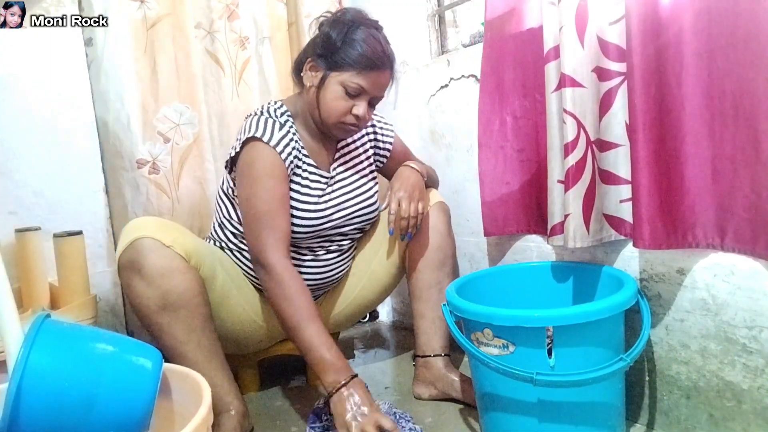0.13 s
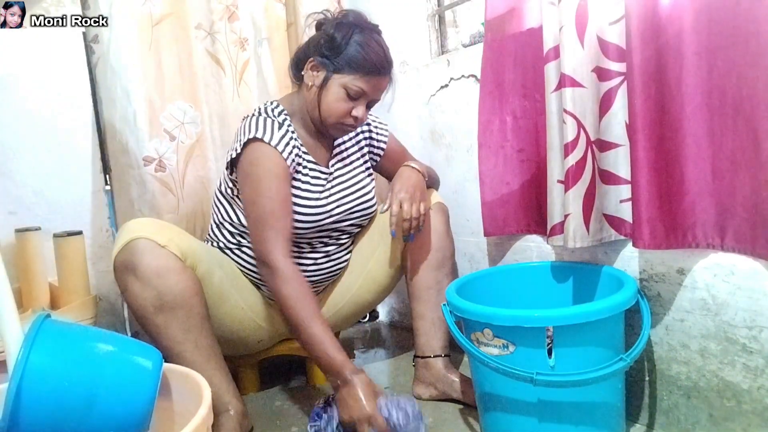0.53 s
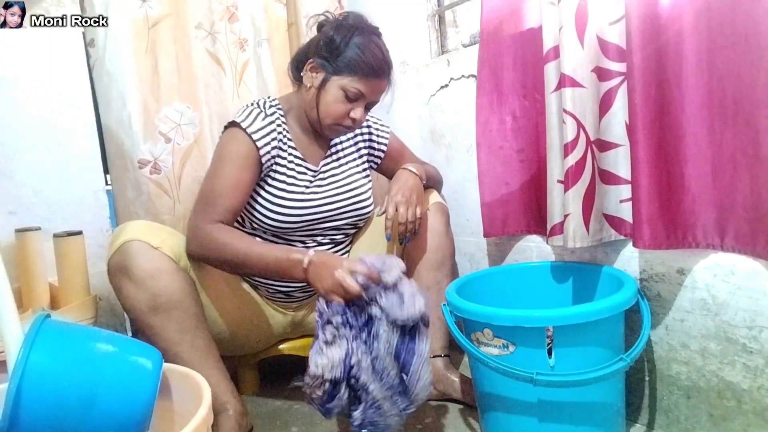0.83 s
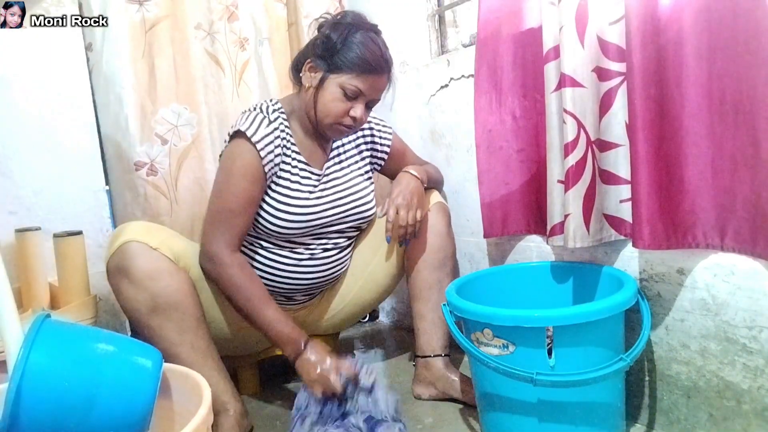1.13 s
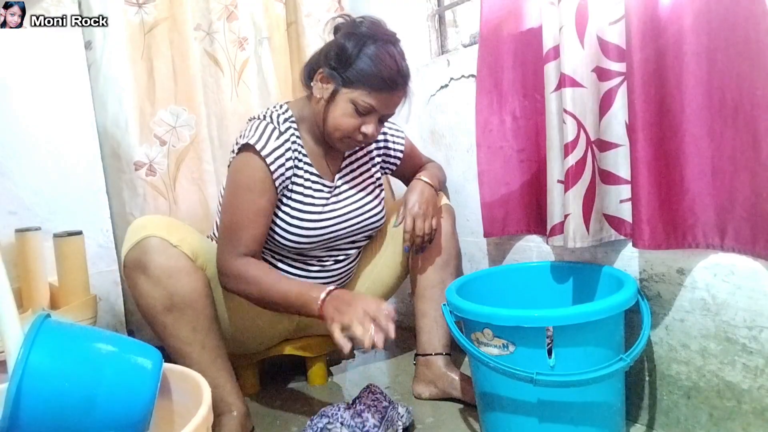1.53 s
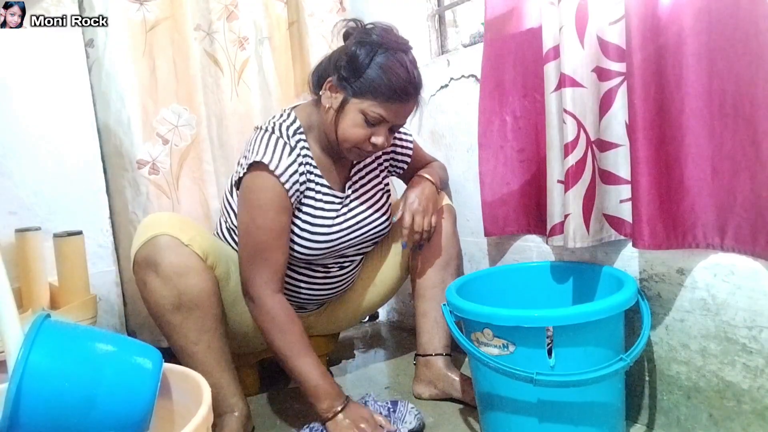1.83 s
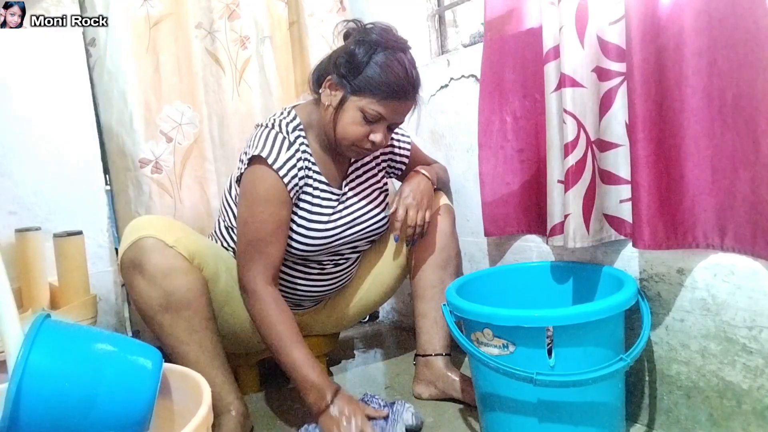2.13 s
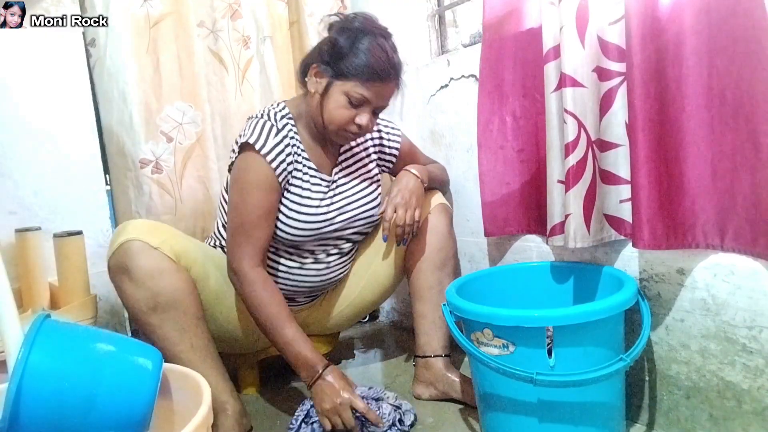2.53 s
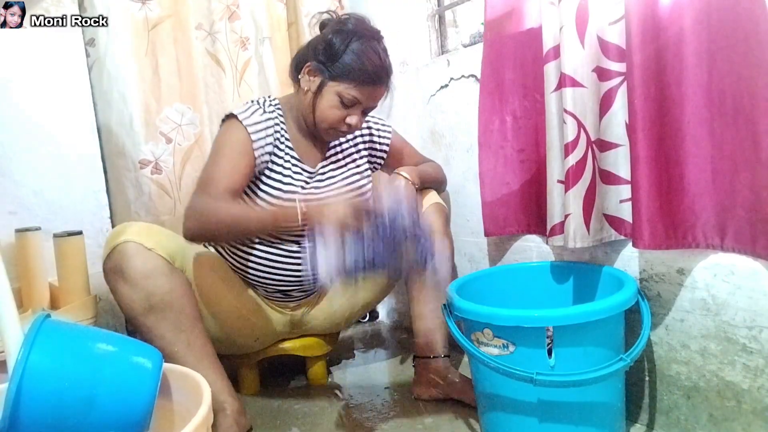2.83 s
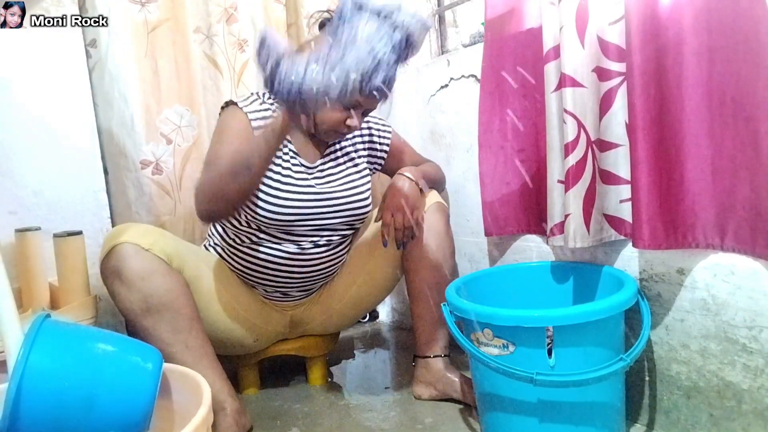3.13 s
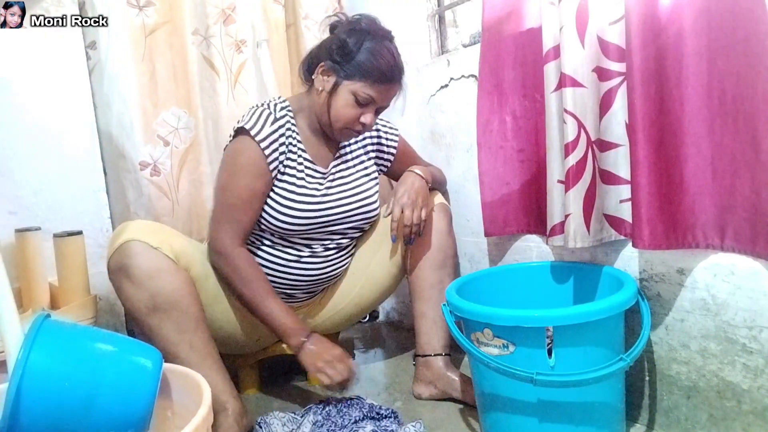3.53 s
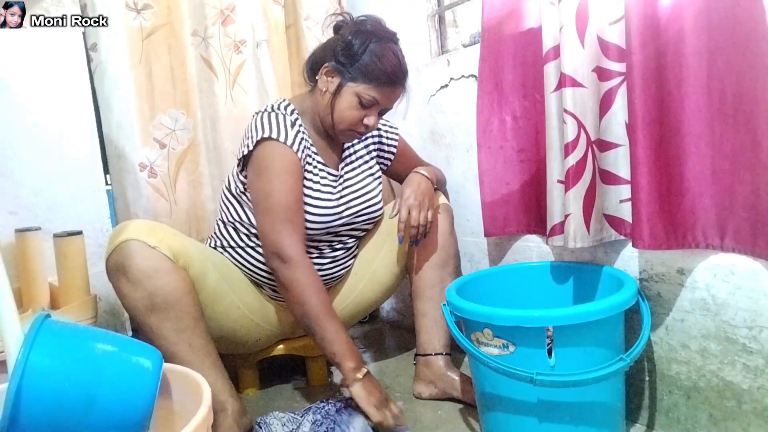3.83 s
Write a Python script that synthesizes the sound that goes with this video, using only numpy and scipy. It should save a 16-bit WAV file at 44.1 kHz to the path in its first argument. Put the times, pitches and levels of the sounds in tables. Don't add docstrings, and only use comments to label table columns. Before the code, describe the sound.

Wet cloth slaps a hard wet floor twice, the second much harder, among drips and squelches.

```python
import sys
import numpy as np
from scipy import signal
from scipy.fft import rfft, irfft
from scipy.io import wavfile
from scipy.ndimage import uniform_filter1d

SR = 44100
rng = np.random.default_rng(int(sys.argv[2]) if len(sys.argv) > 2 else 0)


def ratio_of_db(decibels):
    return 10 ** (np.asarray(decibels, float) / 20)


def store_wav(level_fs):
    pcm = np.round(np.clip(np.atleast_2d(level_fs), -1, 1) * 32767)
    wavfile.write(sys.argv[1], SR, pcm.T.astype(np.int16))


N = 176400

# start in seconds, rise in seconds, spray t60 in seconds,
# spray level in dB, thud level against the spray in dB.
SLAPS = [
    (1.735, 0.0047, 0.16, -28, -5),
    (3.408, .011, 0.11, -17.5, 0),
]
# frequency in Hz, level in dB, t60 in seconds.
THUD_MODES = [
    [(76, -5, 0.21), (109, -23, .15), (156, -6, .24), (260, -2, 0.12), (315.4, 3.5, 0.29), (401, 8, 0.1),
     (603, -4, 0.19), (1020, -5, .1)],
    [(32.5, -13, 0.83), (76.5, -8.5, 0.43), (99, -12.5, 0.23), (147.4, -12, 0.52), (178, -6.5, 0.27),
     (232, -13, 0.59), (313.3, -7.5, 0.29), (430, -25, .3), (504, -2.5, 0.31), (589, -5.5, 0.25),
     (652, -6.5, 0.24), (905, -17, 0.17)],
]
# start in seconds, level in dB, frequency in Hz.
ROCKS = [
    (3.412, -31.5, 52.5),
    (3.455, -38, 36),
    (3.531, -35.5, 41),
    (3.594, -53, 39.3),
    (3.656, -46, 45),
]
# start in seconds, length in seconds, level in dB, tilt in dB per octave.
FLOPS = [(.5, 0.045, -61.5, -3), (0.673, 0.036, -63.5, -1), (1.128, 0.026, -48, 0.4),
         (1.166, 0.031, -48, 2.5), (1.362, 0.022, -66, 5), (2.096, 0.06, -62, 1.5),
         (2.173, 0.074, -69.5, 0), (2.495, 0.028, -57.5, -1), (3.528, 0.02, -48, -1.5),
         (3.79, 0.051, -59.5, -1.5), (3.931, 0.044, -58, -0.5)]
# start in seconds, length in seconds, level in dB, centre in Hz.
SQUELCHES = [(0.502, 0.044, -70, 3500), (0.665, 0.042, -73, 6600), (1.86, 0.094, -64.5, 3440),
             (2.147, 0.056, -63.5, 3070), (2.175, 0.033, -65.5, 4370), (2.23, 0.034, -68, 3750),
             (2.6, 0.12, -71.5, 3740), (3.92, 0.061, -57, 600), (1.13, 0.098, -54.5, 600)]
# time in seconds, level in dB, centre in Hz, width in octaves.
DRIPS = [(0.1497, -56, 10100, 0.62), (0.3716, -57, 10000, 0.7), (0.5764, -64, 9300, 0.13),
         (.7771, -52, 14200, .2), (0.8247, -45.5, 11500, 0.76), (0.979, -50, 9700, 0.55),
         (1.1318, -50.5, 3940, 0.21), (1.931, -54.5, 9000, 0.43), (2.1147, -51, 9500, 0.23),
         (2.134, -40, 9150, 0.54), (2.245, -55, 6140, 1), (2.3856, -45.5, 10500, 0.17),
         (2.555, -60, 12000, 0.17), (2.692, -58.5, 8350, 0.26), (2.8467, -55, 8400, 0.24),
         (2.9497, -50.5, 10700, 0.55), (3.0061, -52, 10900, 1), (3.0888, -50, 4100, 0.52),
         (3.09, -46.5, 6840, .3), (1.891, -52.5, 10800, 0.48), (.764, -65, 12000, 0.38),
         (3.098, -55, 12500, 0.43), (3.1448, -51.5, 10800, 0.69), (3.22, -57, 11100, 0.69),
         (3.256, -48.5, 9200, 0.22), (3.2956, -59, 11000, 0.45), (3.3296, -51, 12000, 0.49),
         (3.3514, -43, 8900, 1), (3.3781, -38, 9300, 0.62)]
# time in seconds, level in dB.
KNEADING = [(0, -71), (.3, -77.5), (.6, -70.5), (.9, -76), (1.4, -71.5), (1.6, -80), (2, -70.5),
            (2.2, -74.5), (2.6, -69.5), (2.8, -75), (3.1, -77.5), (3.4, -75), (3.7, -77), (4, -64.5)]
# time in seconds, pitch in Hz, level in dB.
CHIRP_PATH = [(.975, 6940, -80), (.985, 7030, -76), (1.04, 6640, -72), (1.125, 6500, -74),
              (1.15, 6450, -85)]
# frequency in Hz, level in dB.
SPRAY_SPECTRUM = [(60, -14.5), (300, 3), (600, -6), (1050, -3), (2000, -6), (5000, -12), (9000, -8.5),
                  (16000, -13)]
# frequency in Hz, level in dB.
AIR_SPECTRUM = [(20, -7), (70, -0.5), (125, -11.5), (400, -16), (1100, -18), (2400, -27), (5800, -37.5),
                (9000, -41.5), (16000, -43)]
# frequency in Hz, width in Hz, level in dB.
FAN_HUMS = [(175.7, 62, -66.5), (294, 16, -65), (345.4, 37.3, -59), (413.4, 48, -67), (600, 54, -72.5),
            (845, 5.3, -73), (946, 23.5, -73.5), (1043, 5.9, -73)]
# frequency in Hz, t60 in seconds.
WALL_T60 = [(100, 1), (300, 0.58), (1000, 0.38), (3000, .3), (8000, 0.24), (15000, .22)]

THUD_DB, THUD_LAG_S = -5.5, 0.00541
GRAIN_DB = 2.5
ROCK_CYCLES = 1.15
DRIP_S, FIZZ_S, FIZZ = 0.0016, 0.007, 0.45
AIR_DB = -56.5
WALLS_DB, DRIP_WET_DB, ROOM_LOW_HZ = -4.5, 1.5, 330
MIC_HZ, MIC_WIDTH_HZ, MIC_DB = 9025, 2000, 4.5
EDGE_HZ = 15520


def evened(x):
    return x / np.sqrt(np.mean(x ** 2) + 1e-20)


def drift(count, span):
    return evened(uniform_filter1d(rng.standard_normal(count), span))


def read(points, hz):
    f, value = np.transpose(points)
    return np.interp(np.log(hz + 1), np.log(f + 1), value)


def add(mix, s, sound):
    part = mix[round(s * SR):][:len(sound)]
    part += sound[:len(part)]


def colour(x, shape_db):
    hz = np.fft.rfftfreq(len(x), 1 / SR) + 1
    return irfft(rfft(x) * ratio_of_db(shape_db(hz)), len(x))


def resonate(x, hz, width):
    turn = np.exp(2j * np.pi * np.cumsum(hz * np.ones(len(x))) / SR)
    r = np.exp(-np.pi * width / SR)
    smooth = signal.lfilter([1 - r], [1, -r], x / turn + 1e-18)
    return 2 * (turn * smooth).real


def droplets(count, share):
    chance, size = rng.random((count, 2)).T
    sign = np.sign(chance - share / 2)
    return (chance < share) * sign * ratio_of_db(-GRAIN_DB * np.log(size + 0.01))


def slap(start, rise, t60, level_db, thud_db):
    t = np.arange(SR // 2) / SR
    spray = evened(colour(droplets(len(t), 0.5), lambda hz: read(SPRAY_SPECTRUM, hz)))
    swell = np.minimum(t / rise, 1) ** 2
    decay = ratio_of_db(-60 * np.maximum(t - rise, 0) / t60)
    return start, ratio_of_db(level_db) * spray * swell * decay


def thud(start, rise, level_db, modes):
    t = np.arange(SR // 2) / SR
    body = np.zeros(len(t))
    for hz, db, t60 in modes:
        age = np.maximum(t - THUD_LAG_S * rng.random(), 0)
        body += ratio_of_db(db - 60 * age / t60) * np.sin(2 * np.pi * hz * age)
    return start, ratio_of_db(level_db) * body * np.minimum(t / rise, 1)


def rock(start, level_db, hz):
    turn = np.arange(SR // 5) / SR * hz
    bump = turn * np.exp(1 - (turn / ROCK_CYCLES) ** 2)
    return start, ratio_of_db(level_db) * np.sin(2 * np.pi * turn) * bump


def flop(start, length, level_db, tilt_db):
    t = np.arange(SR // 4) / SR
    clumps = ratio_of_db(2.5 * drift(len(t), 180))
    spray = colour(droplets(len(t), 0.3),
                   lambda hz: read(SPRAY_SPECTRUM, hz) + tilt_db * np.log2(hz / 3000))
    attack = np.minimum(t / 0.0011, 1)
    level = ratio_of_db(level_db - 520 * np.maximum(t - length, 0))
    return start, level * attack * evened(spray) * clumps


def squelch(start, length, level_db, centre_hz):
    t = np.arange(0, length, 1 / SR)
    fizz = colour(droplets(len(t), 0.068), lambda hz: -25 * np.log2(hz / centre_hz) ** 2)
    return start, ratio_of_db(level_db) * evened(fizz) * np.sin(np.pi * t / length)


def drip(start, level_db, centre_hz, octaves):
    t = np.arange(-256, 2048) / SR
    age = abs(t)
    decay = np.exp(-age / DRIP_S) + FIZZ * np.exp(-age / FIZZ_S) + 0.094 * np.exp(-age / 0.025)
    burst = rng.standard_normal(len(t)) * (t > 0) * decay
    tick = colour(burst, lambda hz: -9 * (np.log2(hz / centre_hz) / octaves) ** 2)
    return start + t[0] - 0.0005, ratio_of_db(level_db + 2) * tick / abs(tick).max()


def knead():
    s, level_db = np.transpose(KNEADING)
    effort_db = np.interp(np.arange(N) / SR, s, level_db)
    crackle = colour(droplets(N, 0.1), lambda hz: -9 * np.log2(hz / 9300) ** 2)
    return ratio_of_db(effort_db + 1.1 * drift(N, 900)) * evened(crackle)


def chirp():
    s, hz, level_db = np.transpose(CHIRP_PATH)
    t = np.arange(N) / SR
    pitch = np.interp(t, s, hz) + 45 * drift(N, 200)
    tone = np.sin(2 * np.pi * np.cumsum(pitch) / SR)
    return tone * ratio_of_db(np.interp(t, s, level_db, -140, -140) + 4 * drift(N, 400))


def fan():
    air = evened(colour(rng.standard_normal(N), lambda hz: read(AIR_SPECTRUM, hz)))
    sound = ratio_of_db(AIR_DB + drift(N, 6000) / 2) * air
    white = rng.standard_normal(N)
    for hz, width, db in FAN_HUMS:
        hum = resonate(resonate(white, hz, width), hz, 1.15 * width)
        sound += ratio_of_db(db) * evened(hum)
    return sound


def walls(x):
    taps, at = np.zeros(SR), np.arange(120, SR - 10, 10)
    taps[at + rng.integers(0, 10, len(at))] = rng.choice([-1., 1.], len(at))
    band_hz, t, bands = signal.stft(taps, SR, nperseg=256)
    decay = ratio_of_db(-60 * t / read(WALL_T60, band_hz)[:, None])
    tail = signal.istft(bands * decay, SR, nperseg=256)[1]
    lumps = uniform_filter1d(abs(rfft(tail)) ** 2, size=120)
    even = uniform_filter1d(lumps, size=1500) / lumps
    tail = colour(tail, lambda hz: 10 * np.log10(even / (1 + (ROOM_LOW_HZ / hz) ** 4)))
    return signal.fftconvolve(x, tail / np.linalg.norm(tail))[:N]


def scene():
    cloth, drops, solid = knead(), np.zeros(N), np.zeros(N)
    for (start, rise, _, level_db, thud_db), modes in zip(SLAPS, THUD_MODES):
        add(solid, *thud(start, rise, level_db + thud_db + THUD_DB, modes))
    for mix, source, rows in ((cloth, slap, SLAPS), (solid, rock, ROCKS), (cloth, flop, FLOPS),
                              (cloth, squelch, SQUELCHES), (drops, drip, DRIPS)):
        for row in rows:
            add(mix, *source(*row))
    room = ratio_of_db(WALLS_DB) * walls(cloth + ratio_of_db(DRIP_WET_DB) * drops)
    return (cloth + drops + room + solid + chirp() + fan())[None]


def low_pass(x):
    return signal.sosfilt(signal.butter(12, 16200, fs=SR, output="sos"), x)


def record(dry):
    sound = dry[0]
    peak = resonate(resonate(sound, MIC_HZ, MIC_WIDTH_HZ), MIC_HZ, MIC_WIDTH_HZ)
    tip = resonate(sound, 9100, 860)
    bright = sound + ratio_of_db(MIC_DB) * peak + ratio_of_db(-9.5) * tip
    lowpass = signal.firwin(511, EDGE_HZ, window=("kaiser", 9), fs=SR)
    limited = signal.oaconvolve(bright, lowpass, "same")
    return low_pass(limited[None])


dry = scene()
out = record(dry)
store_wav(out)
```